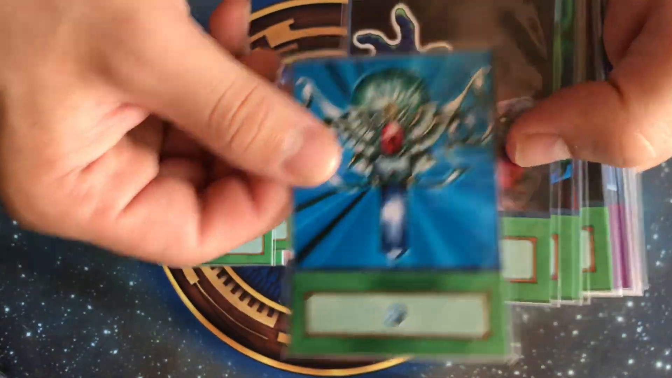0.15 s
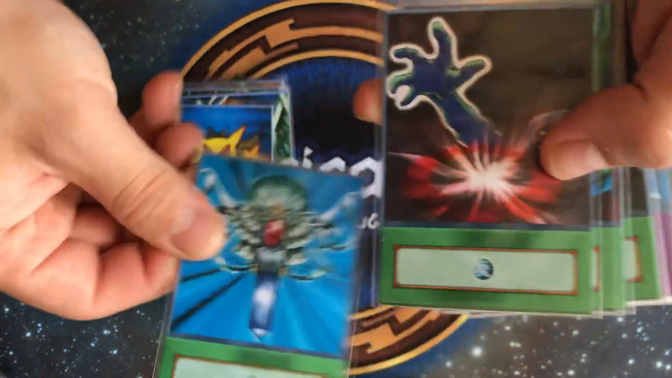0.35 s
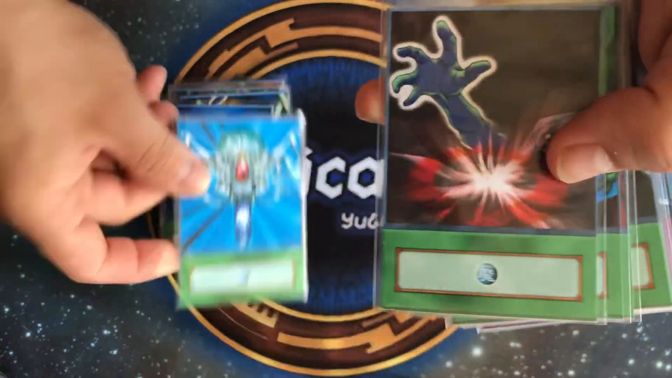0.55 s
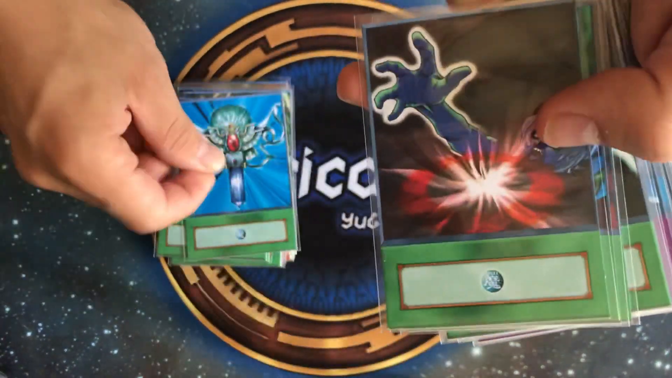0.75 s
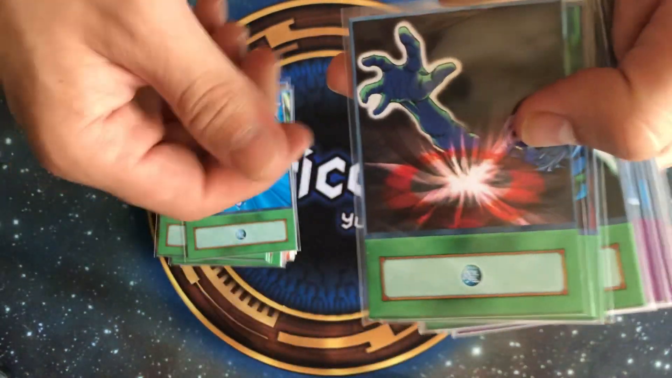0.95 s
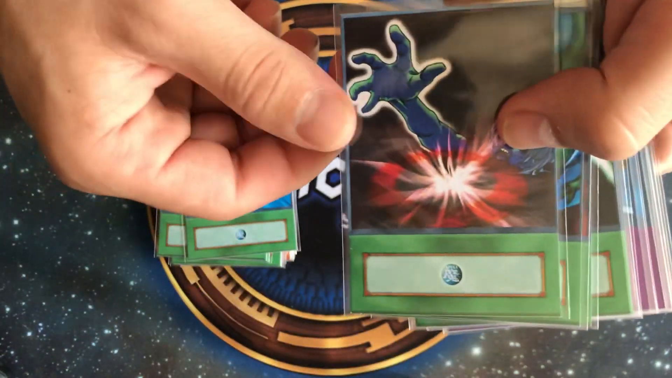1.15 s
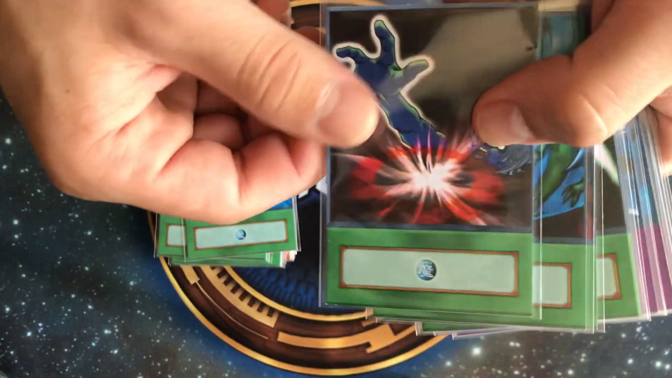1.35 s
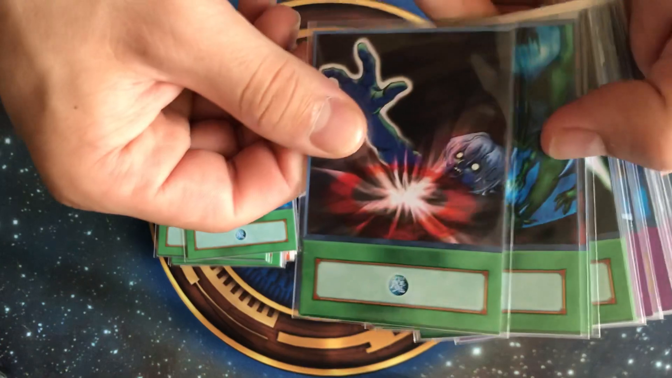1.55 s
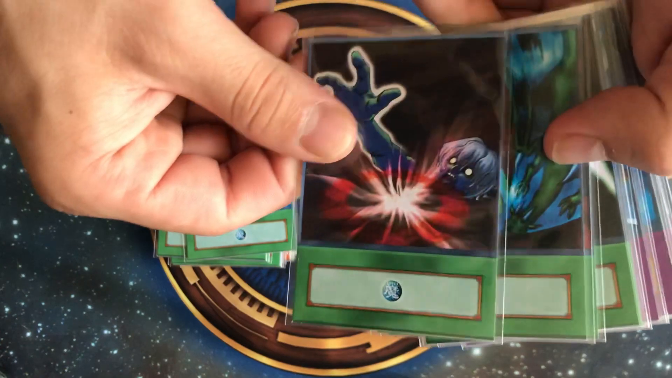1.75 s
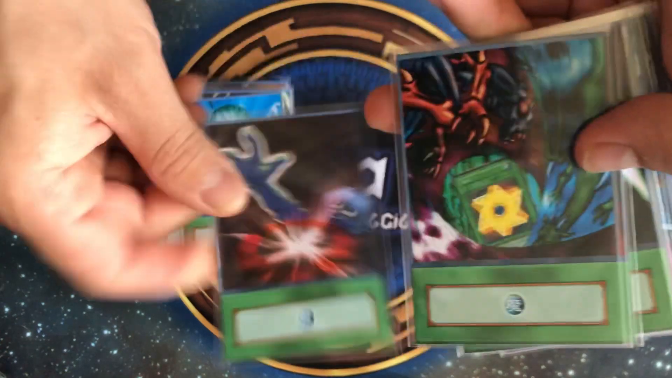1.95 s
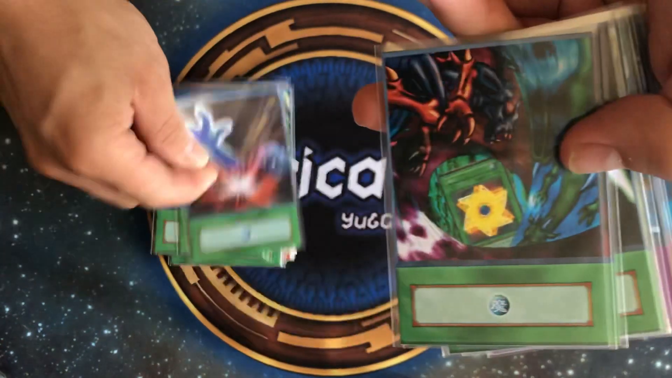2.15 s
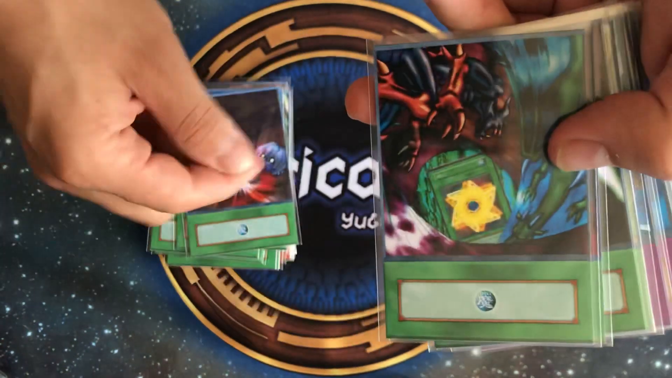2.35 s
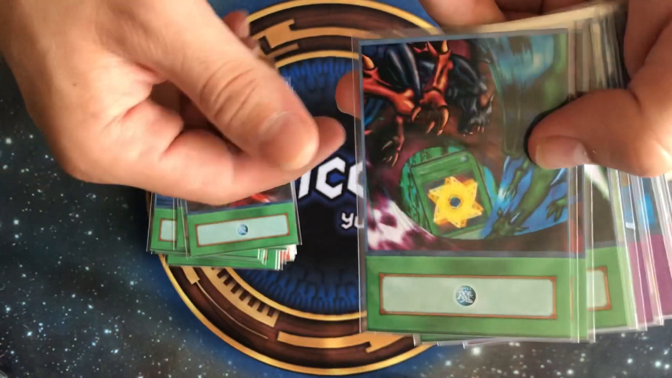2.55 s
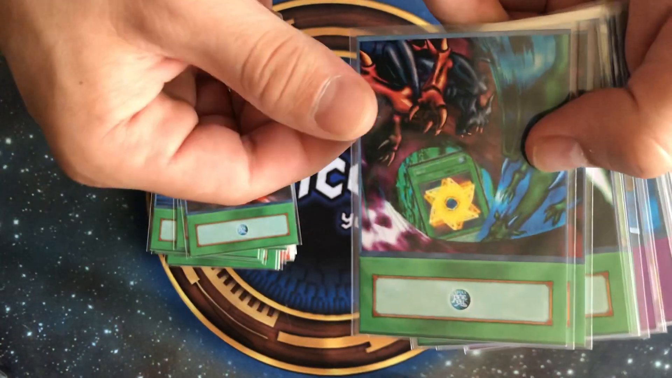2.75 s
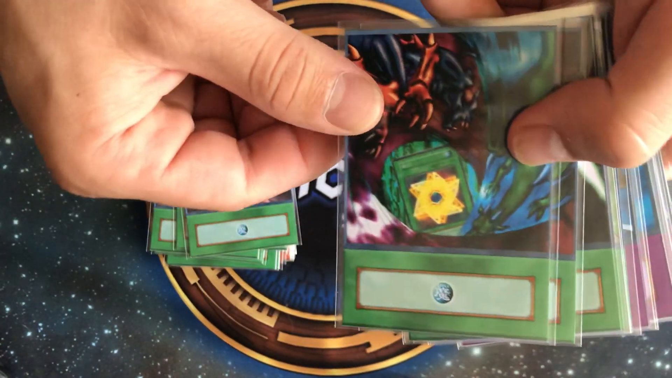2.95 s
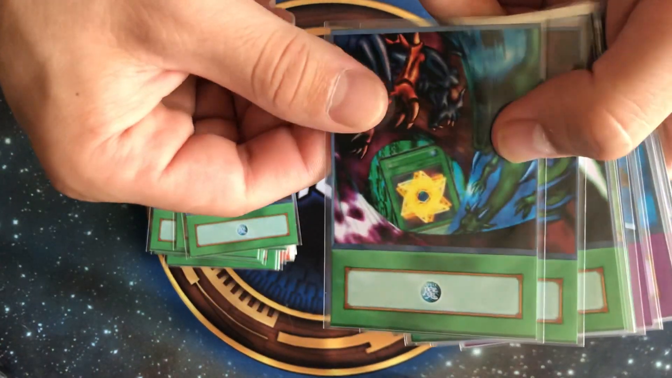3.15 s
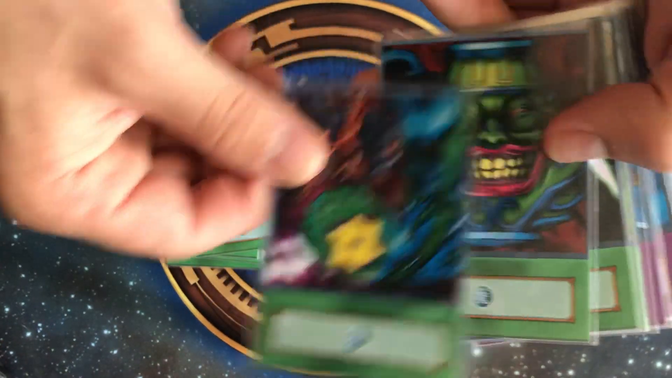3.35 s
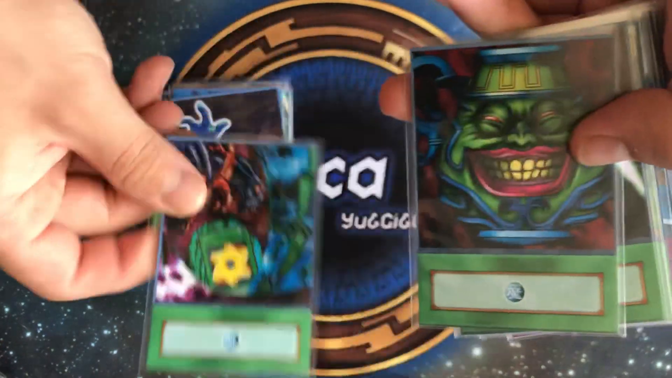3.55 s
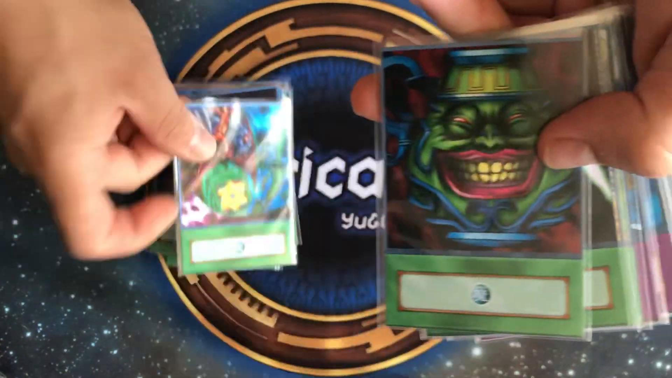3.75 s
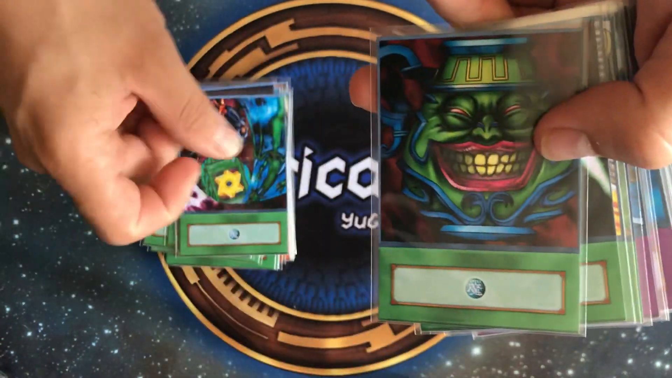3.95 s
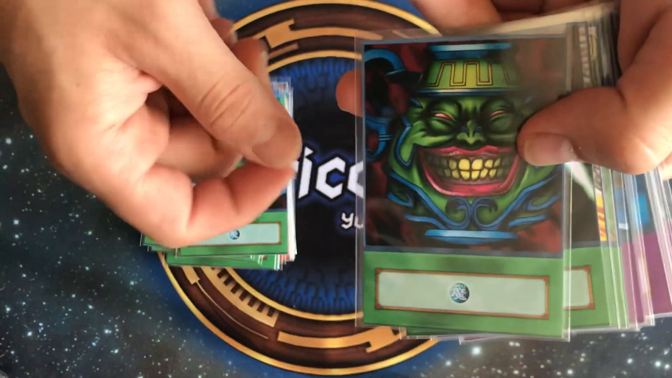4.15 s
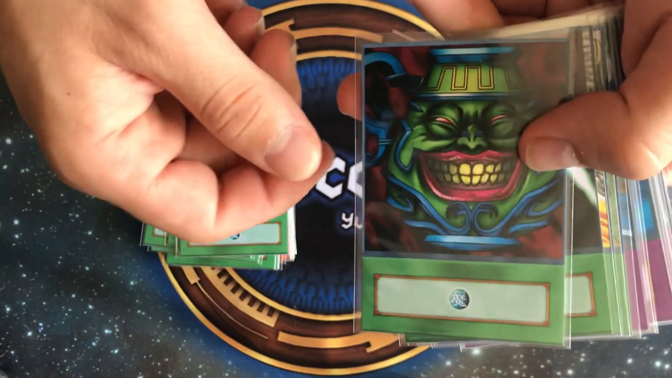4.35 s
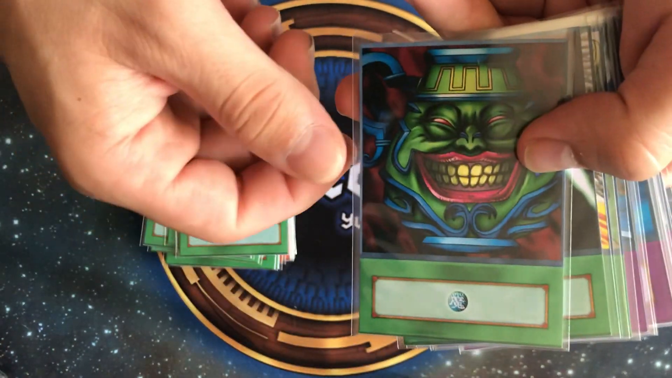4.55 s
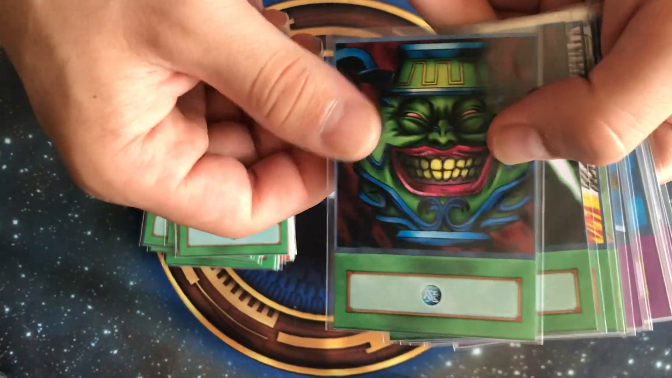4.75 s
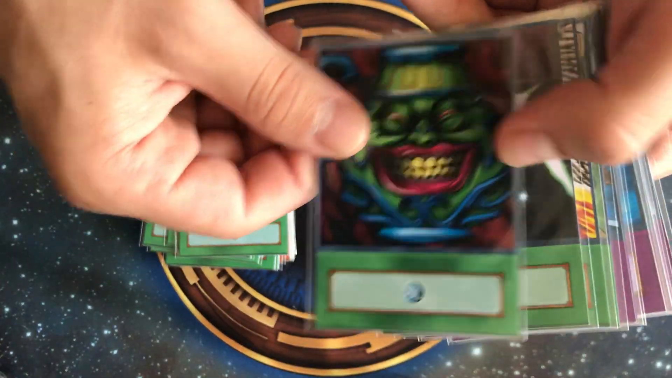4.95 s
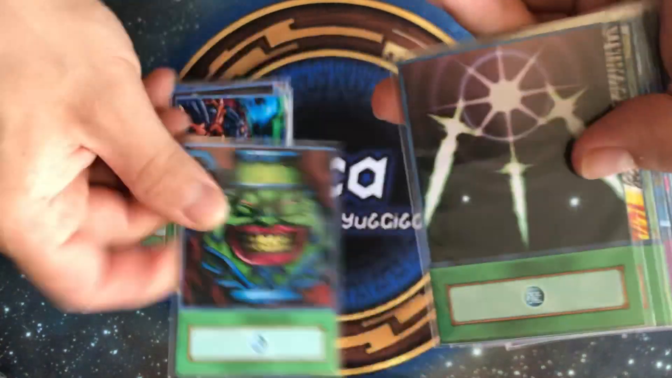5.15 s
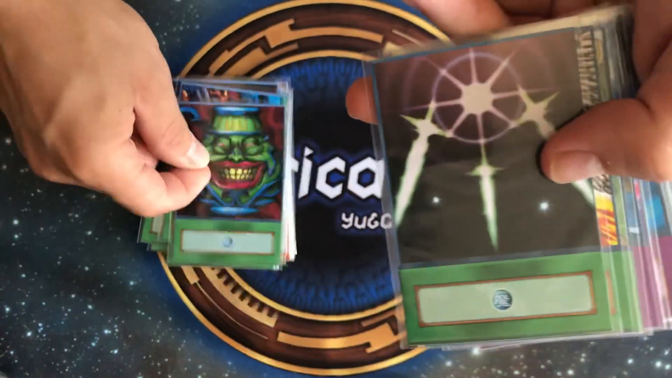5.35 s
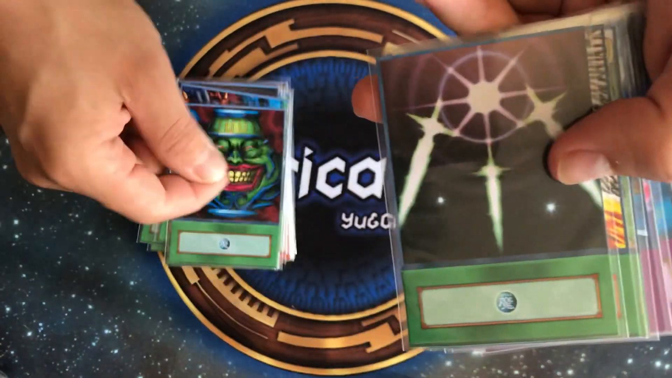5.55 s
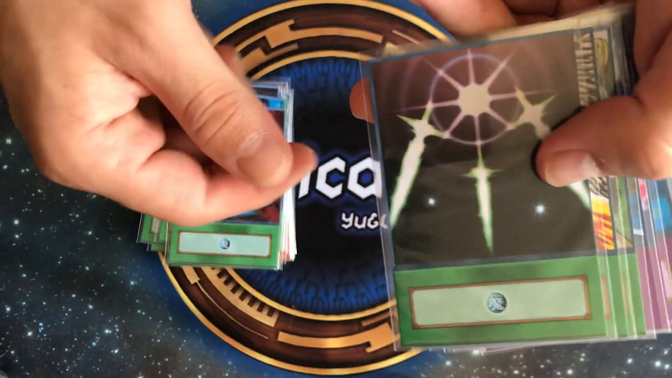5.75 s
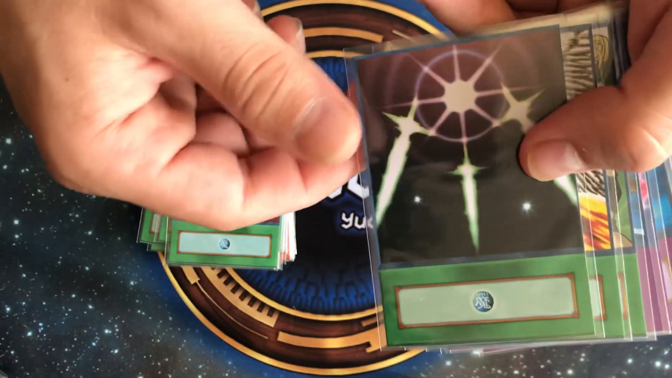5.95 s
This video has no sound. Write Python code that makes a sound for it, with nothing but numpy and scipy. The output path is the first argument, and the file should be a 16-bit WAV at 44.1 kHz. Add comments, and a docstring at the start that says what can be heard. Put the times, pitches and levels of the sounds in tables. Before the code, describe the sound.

Plastic-sleeved cards snap sharply off a held stack and tap onto a pile, with brief slides and squeaks over a faint low hum.

```python
"""Dealing sleeved cards

Sleeved cards are dealt one by one onto a cloth mat, close to the microphone in a small quiet room.
Bursts of tiny slips ring each card as it snaps free or lands; damped low modes give the thumps,
gated friction noise the slides, and stick-slip tones the squeaks. Mains hum, a far motor and a low
rumble lie underneath; after a loud click the recorder stays briefly in a hissier range."""
import sys
import numpy as np
from scipy import signal
from scipy.fft import rfft, irfft
from scipy.io import wavfile
from scipy.ndimage import uniform_filter1d

SR = 44100
rng = np.random.default_rng(int(sys.argv[2]) if len(sys.argv) > 2 else 0)


def wrap_up_sound(samples):
    """Save the sound to the file named by the first command line argument, as 16-bit audio."""
    columns = np.atleast_2d(samples).T
    # keep every value between -1 and 1, then stretch to whole-number steps
    tamed = np.clip(columns, -1, 1)
    steps = np.round(tamed * 32767).astype(np.int16)
    wavfile.write(sys.argv[1], SR, steps)


N = 264600
TIME = np.arange(N) / SR
HZ = np.fft.rfftfreq(N, 1 / SR)

# colour of a sleeved card at the microphone: (frequency [Hz], level [dB])
SLEEVE = [(30, -32), (100, -14.5), (240, -0.5), (450, -6), (700, -2.5), (1000, 2), (1350, 0.5),
          (4200, -0.5), (5000, -3.5), (6200, 0), (7700, -1), (9300, 0.5), (10400, -4.5), (12000, 1),
          (13200, 0), (15000, -1), (16500, -15.5)]


def amp(db):
    """Level to amplitude: 20 dB is a factor of ten."""
    return 10 ** (np.asarray(db) / 20)


def unit(x):
    """Normalisation: scales a signal to rms 1."""
    return x / np.sqrt(np.mean(x ** 2) + 1e-30)


def read(points, hz):
    """Logarithmic pitch scale: interpolates (frequency [Hz], value) points along log frequency."""
    f, value = np.transpose(points)
    return np.interp(np.log(hz + 1), np.log(f + 1), value)


def curves(rows):
    """Linear interpolation: every column of a (time [s], ..) table at each sample."""
    s, *columns = np.transpose(rows)
    return [np.interp(TIME, s, c) for c in columns]


def add(mix, s, sound):
    """Superposition: mixes a sound in at time s."""
    part = mix[max(round(s * SR), 0):][:len(sound)]
    part += sound[:len(part)]


def coloured(x, db):
    """Spectral shaping: filters a full-length signal by a dB curve, then scales it to rms 1."""
    return unit(irfft(rfft(x) * amp(db), N))


def ring(x, db):
    """Minimum-phase filtering: each resonance of the dB curve rings on after the blow."""
    both_sides = np.concatenate([db, db[-2:0:-1]])
    log_gain = np.log(amp(both_sides))
    response = np.exp(np.conj(signal.hilbert(log_gain)))[:len(db)]
    return irfft(rfft(x) * response)


def contact(mix, s, db, rise_ms, fall_ms, colour, chatter_db, chatter_ms, creep_ms=1.0, size=4096):
    """Impulsive friction: dense tiny slips swell to the release, then chatter out and ring the card."""
    lead = size // 4
    ms = (np.arange(size) - lead) * 1000 / SR
    hz = np.fft.rfftfreq(size, 1 / SR)
    swell = np.exp(-abs(ms) / np.where(ms < 0, rise_ms, fall_ms))
    chatter = amp(chatter_db) * np.exp(-abs(ms) / np.where(ms < 0, creep_ms, chatter_ms))
    slips = rfft(rng.standard_normal(size) * np.hypot(swell, chatter))
    # the slips feed all pitches alike
    slips /= np.sqrt(uniform_filter1d(abs(slips) ** 2, size=70) + 1e-12)
    sound = ring(irfft(slips), read(SLEEVE, hz) + colour(hz))
    # the level holds the energy of a burst lasting 1 ms
    rms_over_1_ms = np.sqrt(np.sum(sound ** 2) * 1000 / SR)
    add(mix, s - lead / SR, amp(db) * sound / rms_over_1_ms)


def snaps(ring_share=1.0, null_db=-13, width_hz=130, damping=0.05):
    """Plate modes: the grip sets a card's free length, shifting all its resonances; its faces cancel at one null."""
    # a bent card springs free or lands: (time [s], level as if lasting 1 ms [dB], rise [ms], fall [ms],
    # body, middle and upper level against the treble [dB], pitch ratio of the free part [1], null [Hz])
    clicks = [(0.4394, -28.5, 0.33, 1.4, -6, -8.5, -11.5, 0.78, 4470),
              (0.5439, -33, 0.44, 0.91, -3, -7.5, -2, 1.04, 4340),
              (0.7287, -15, 0.25, 1.1, -12, -18, -5, 1.03, 4023),
              (2.0128, -23.5, .16, .29, 2, -4.5, -10, 1.31, 1050),
              (2.2693, -18.5, 0.57, 1.04, 3, -2, 7, .98, 680),
              (2.2708, -18, 0.063, 1.3, 6, 5.5, -1, 1.22, 690),
              (3.4662, -14, 0.13, 0.18, -2, -5.5, -13.5, 1.243, 3950),
              (3.5388, -27, 0.13, 0.21, -3, -13, -5.5, 1.17, 12900),
              (3.9136, -21, 0.86, 0.71, -9, -15, 0, 0.96, 3420),
              (5.178, -24.5, 1.4, 0.77, 5.5, 1.5, -4, 1.245, 4820),
              (5.26, -33.5, 5.1, .96, 0, 1, 16, 1.36, 5630),
              (5.4466, -26, 0.71, 2.6, -1.5, -2.5, -2, 0.68, 3920),
              (5.4489, -21, 0.22, 1.6, -3.5, -0.5, -4, 0.82, 3240)]
    # resonances of a card: (frequency at pitch ratio 1 [Hz], height at full ring share [dB])
    card_modes = [(495, 2), (1280, 4), (1975, 7.5), (2555, 9.5), (4010, 6), (4420, 9.5), (7290, 4.5),
                  (10040, 7.5), (12240, 6)]
    out = np.zeros(N)
    for s, db, rise, fall, body, middle, upper, pitch, null in clicks:
        def colour(hz):
            """Modal superposition: an overall slope, plus the resonances and the null."""
            def bump(f):
                """Resonance curve: a peak of height 1 that broadens with frequency."""
                return 1 / (1 + ((hz - f) / (width_hz + damping * f)) ** 2)

            slope = read([(500, body), (2200, middle), (6500, upper), (13000, 0.0034)], hz)
            modes = sum(height * bump(f * pitch) for f, height in card_modes)
            return slope + ring_share * modes + null_db * bump(null)
        contact(out, s, db, rise, fall, colour, chatter_db=-17, chatter_ms=2.2)
    return out


def scuffs():
    """Edge friction: softer contacts, mostly longer, with a smooth tilt in place of card resonances."""
    # a sleeve edge catches: (time [s], level as if lasting 1 ms [dB], rise [ms], fall [ms],
    # tilt toward the treble [dB])
    catches = [(0.0461, -48.5, 6.7, 0.5, 3.5), (0.1846, -46.5, 1.9, 13, -2),
               (0.4355, -27.5, 1.3, 2.8, 12.5), (0.6422, -36, 5, 1.2, 11.5), (0.6591, -47.5, 1, 1.8, -15),
               (0.6781, -44.5, 0.62, 1.5, -8.5), (1.2114, -57, .6, 1.2, 3), (1.4544, -40, 0.34, .6, 14.5),
               (1.5323, -50, 0.71, 2, -24), (1.555, -48, 0.8, 7.9, -6), (2.001, -28.5, 2.8, 12.4, 7.5),
               (2.0407, -37.5, 3, 1.7, 3.5), (2.1165, -55.5, 0.41, .6, -0.5),
               (2.2022, -51, 0.48, 1.7, -23.5), (3.349, -54, 3, 2, 9), (3.452, -39, .44, 0.56, 14.5),
               (3.7052, -36, 3.6, 1.35, 5), (4.9918, -50, 1, 1.3, 21), (5.162, -29, 2.7, 3, 12.5),
               (5.3798, -56, .5, 1.5, -11), (5.417, -40, 1.4, 1.4, -19), (5.9838, -59.5, .5, 1, -12)]
    upper_share, upper_db = 0.5, -1.5  # at 6.5 kHz: share of the tilt, and a steady offset
    out = np.zeros(N)
    for s, db, rise, fall, tilt in catches:
        slope = [(400, -tilt - 6), (2000, -tilt), (6500, upper_db - tilt * upper_share), (13000, 0.0031)]
        contact(out, s, db, rise, fall, lambda hz: read(slope, hz), chatter_db=-19.5, chatter_ms=2.8)
    return out


def thumps():
    """Damped oscillation: a few low swings of a knock, a slower sway and a short hollow ring."""
    # the held stack rocks as a card leaves, the pile knocks as it lands: (time [s], knock level before
    # decay [dB], knock frequency [Hz], hand's sway and stack's hollow ring against the knock [dB])
    blows = [(0.4417, -31, 197, -4, -16), (2.014, -35, 150, -3, 2), (2.271, -36.5, 175, -20, -10),
             (3.467, -40, 303, -29.5, -8), (3.541, -34.5, 103, -30, -10), (3.914, -42.5, 200, -27.5, -18),
             (5.181, -29.5, 140, -2, -6.5), (5.448, -37.5, 190, -25, -14)]
    rise_swings, knock_swings = 0.59, 6.3  # periods of soft start, and of the knock's 60 dB decay
    sway_hz, sway_t60_s = 67, 0.068
    stack_hz, stack_t60_s = 629, 0.023
    out, t = np.zeros(N), TIME[:SR // 4]

    def swing(hz, t60):
        """Exponential decay: one damped mode with a soft start."""
        start = np.minimum(t * hz / rise_swings, 1)
        decay = np.exp(-np.log(1000) * t / t60)
        return start * decay * np.sin(2 * np.pi * hz * t)

    for s, db, hz, sway_db, ring_db in blows:
        knock = swing(hz, knock_swings / hz)
        sway = amp(sway_db) * swing(sway_hz, sway_t60_s)
        hollow = amp(ring_db) * swing(stack_hz, stack_t60_s)
        add(out, s, amp(db) * (knock + sway + hollow))
    return out


def slides(grain_db=3, stick_db=1.7, crackles_per_s=160, crackle_db=15):
    """Sliding friction: grainy hiss flutters as the sleeves stick and let go; small burrs crackle."""
    flutter = unit(uniform_filter1d(rng.standard_normal(N), size=260))
    grains = rng.standard_normal(N) * amp(grain_db * rng.exponential(1, N) + stick_db * flutter)
    burrs = (rng.random(N) < crackles_per_s / SR) * rng.standard_normal(N)
    friction = unit(grains) + amp(crackle_db) * burrs
    # middle, upper and treble band: (frequency [Hz], level [dB])
    bands = [[(250, -36.5), (700, -2.5), (1400, 8.5), (3600, 6.5), (5000, -58)],
             [(3000, -49.5), (4400, -4), (6300, -8), (8500, -6.0), (10500, -23.5)],
             [(7500, -40), (9500, -2.5), (13300, -3.5), (17000, -2.5)]]
    out = np.zeros(N)
    for gain, band in zip(stroke_gains(), bands):
        out += gain * coloured(friction, read(SLEEVE, HZ) + read(band, HZ))
    return out


def stroke_gains():
    """Incoherent addition: the powers of overlapping strokes sum, giving middle, upper and treble gain."""
    # one stroke of sleeve on sleeve: (time at its fastest [s], rise [s], fall [s], level at 4-9 kHz [dB],
    # middle and treble against that [dB])
    strokes = [(0.207, 0.032, 0.1, -62.5, 3, -5), (0.39, 0.12, .17, -73.5, 0, 12.5),
               (0.49, 0.18, .3, -68.5, 3, -7), (0.6, 0.19, .3, -69, -1.5, 2), (0.71, .08, .25, -65, 1, 0),
               (1.35, 0.039, 0.15, -76.5, 0, 3.5), (1.56, .04, 0.14, -74, 2, 1),
               (1.975, .125, 0.12, -70.5, 2.5, 13), (2.268, .035, .14, -58.5, 2, 0),
               (3.36, 0.092, 0.39, -78, -1, 1.5), (3.51, 0.1, .16, -67.5, -2, 8),
               (3.68, 0.072, 0.056, -75.5, 7, 10), (3.895, .08, 0.065, -63, -3, -4),
               (5.05, 0.11, 0.24, -67, -3.5, 2.5), (5.15, 0.059, 0.18, -67, 3, 8),
               (5.44, 0.044, 0.2, -63, 0.5, 1)]
    drop_db = 20  # a stroke swells by this over its rise, and fades as much over its fall
    power = np.zeros((3, N))
    for s, rise, fall, db, middle, treble in strokes:
        away = np.where(TIME < s, ((s - TIME) / rise) ** 2, (TIME - s) / fall)
        swell = amp(db - drop_db * np.minimum(away, 10))
        power += (amp([[middle], [0], [treble]]) * swell) ** 2
    return np.sqrt(power)


def squeaks():
    """Stick-slip oscillation: regular slips sing for a moment, uneven ones rasp."""
    # a sleeve sticks as it is drawn: (time [s], half-length to 1/e [ms], level [dB],
    # slip rate at that time [Hz], share of pitch jitter [1]: low sings, high rasps)
    sticks = [(0.194, 12, -53.5, 1838, .22), (0.3187, 3.8, -48, 2067, 0.018),
              (0.325, 38, -61.5, 1990, 0.17), (0.38, 17, -60.5, 2400, 0.18), (1.925, 40, -66, 2890, .12)]
    # harmonics 1 to 4: relative level [dB]
    partials = [-24, -13, -2.5, -18]
    slip_rise_hz_per_s = 2800  # the slips quicken with the pull
    out, t = np.zeros(N), TIME[:SR // 4] - TIME[SR // 8]
    for s, half_ms, db, hz, jitter in sticks:
        waver = unit(uniform_filter1d(rng.standard_normal(len(t)), size=22))
        turns = np.cumsum((hz + slip_rise_hz_per_s * t) * (1 + jitter * waver)) / SR
        tone = sum(amp(level) * np.sin(2 * np.pi * k * turns) for k, level in enumerate(partials, 1))
        swell = np.exp(-(1000 * t / half_ms) ** 2)
        add(out, s + t[0], amp(db) * swell * unit(tone))
    return out


def room(x, tail_db=-18.5, wall_db=5, wall_s=0.016, wall_width_s=0.0069):
    """Diffuse reverberation: a short decaying noise tail, with a cluster of stronger wall echoes."""
    # reverberation time: (frequency [Hz], 60 dB decay [s])
    room_t60 = [(200, 0.31), (2000, 0.2), (8000, 0.19), (16000, 0.052)]
    hz, frame_s, z = signal.stft(rng.standard_normal(SR // 2), SR, nperseg=256)
    decay = np.exp(-np.log(1000) * frame_s / read(room_t60, hz)[:, None])
    tail = signal.istft(z * decay, SR, nperseg=256)[1]
    t = TIME[:len(tail)]
    walls = amp(wall_db * np.exp(-((t - wall_s) / wall_width_s) ** 2))
    tail *= np.minimum(t / 0.005, 1) * walls
    return amp(tail_db) * signal.fftconvolve(x, tail / np.linalg.norm(tail))[:N]


def background(waver_db=2, drift=0.014):
    """Tones over broadband noise: mains hum and a far, wavering motor over rumble and faint hiss."""
    # a distant motor picks up speed: (time [s], frequency before drift [Hz], rms level before waver [dB])
    motor_curve = [(0, 65.3, -83.5), (2.4, 65.7, -63), (4.0, 66.86, -68.5), (4.3, 66.2, -58),
                   (5.1, 70.4, -57), (6, 68, -56)]
    # steady noise: (frequency [Hz], relative level per Hz [dB])
    floor_shape = [(20, -60), (27, -39), (32, -17), (38, -4.5), (60, 4), (115, -5.5), (210, -11.5),
                   (520, -23), (950, -22), (1900, -30.5), (4200, -34.5), (4900, -37.5), (6200, -36.5),
                   (10500, -41), (13000, -36.5), (15700, -40)]
    floor_db, mains_hz, mains_db = -59, 101.1, -64.5  # levels are rms
    octave_db = -2.5  # second harmonic of the motor against its first
    motor_hz, motor_db = curves(motor_curve)
    slow = read([(1, -0.5), (4, -0.5), (12, -62.0), (40, -140)], HZ)
    waver, wander = (coloured(rng.standard_normal(N), slow) for _ in range(2))
    motor = 2 * np.pi * (np.cumsum(motor_hz * (1 + drift * wander)) / SR + rng.random())
    mains = 2 * np.pi * (mains_hz * TIME + rng.random())
    drone = amp(motor_db) * (np.sin(motor) + amp(octave_db) * np.sin(2 * motor))
    hum = amp(mains_db) * np.sin(mains) + amp(waver_db * waver) * drone
    rumble = amp(floor_db) * coloured(rng.standard_normal(N), read(floor_shape, HZ))
    return np.sqrt(2) * hum + rumble


def scene():
    """Direct and reverberant field: cards in the room over the background."""
    handling = scuffs() + thumps() + slides() + squeaks()
    # each direction gets other resonances from a card, so the room receives a more even colour
    all_round = snaps(ring_share=0.83, null_db=-6.5)
    return (snaps() + handling + room(all_round + handling) + background())[None]


def record(dry, hiss_db=-61.0):
    """Range switching: a loud peak brings the hiss of a low-gain range for a hold time; then the band limit."""
    # noise of the low-gain range: (frequency [Hz], relative level per Hz [dB])
    hiss_shape = [(100, 15.5), (900, 2.5), (1800, -1.5), (3800, 0), (4500, -1), (4950, -4), (5800, -2),
                  (6700, -2.5), (7700, -6), (9100, -3), (10450, -8.5), (11500, -4.5), (13200, -5),
                  (15700, -9)]
    threshold_db, hold_s, edge_hz = -28, 0.405, 15950
    loud = uniform_filter1d(dry[0] ** 2, size=176) > amp(threshold_db) ** 2  # mean power over 4 ms
    last_loud = np.maximum.accumulate(np.where(loud, TIME, -np.inf))
    held = TIME - last_loud < hold_s
    hiss = amp(hiss_db) * held * coloured(rng.standard_normal(N), read(hiss_shape, HZ))
    low_pass = signal.firwin(401, edge_hz, window=("kaiser", 7), fs=SR)
    return signal.oaconvolve(dry + hiss, low_pass[None], "same")


dry = scene()
out = record(dry)
wrap_up_sound(out)
```